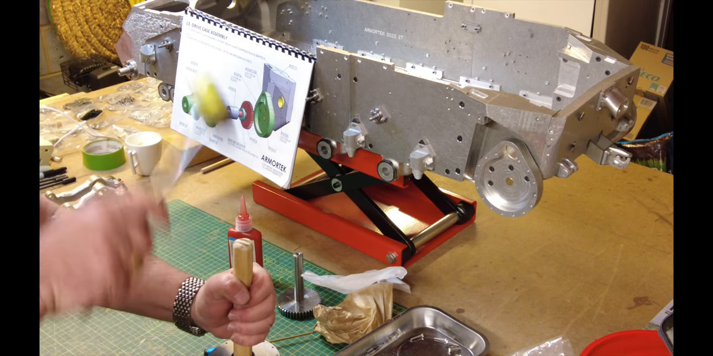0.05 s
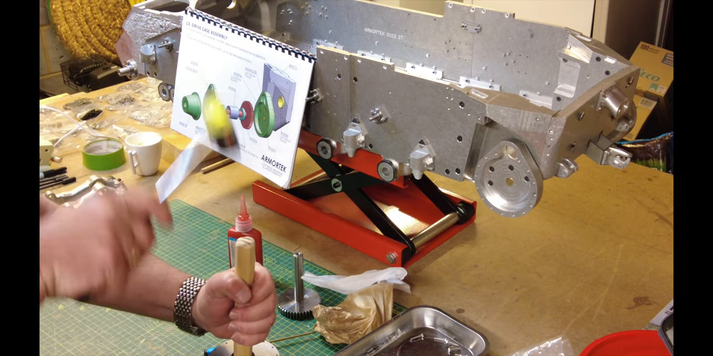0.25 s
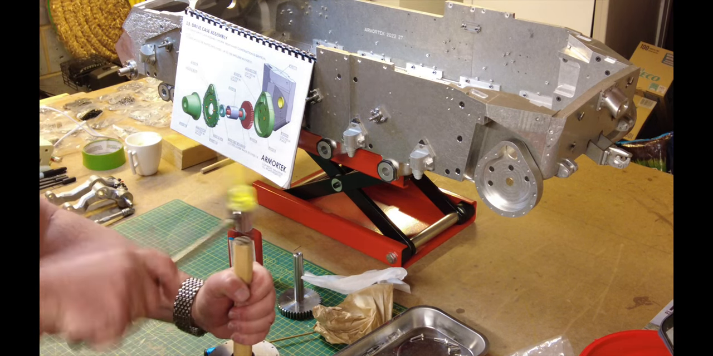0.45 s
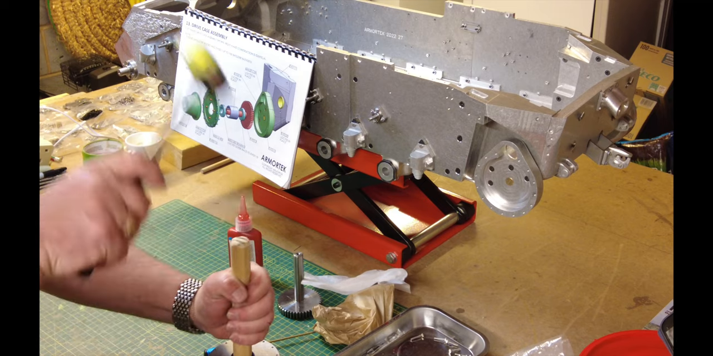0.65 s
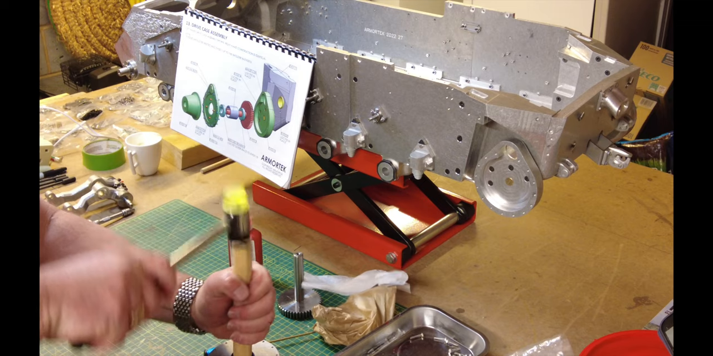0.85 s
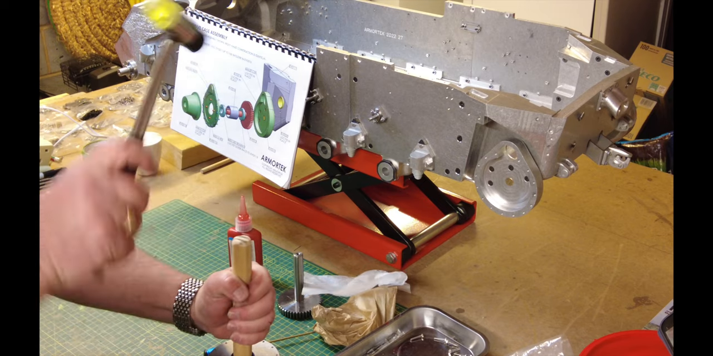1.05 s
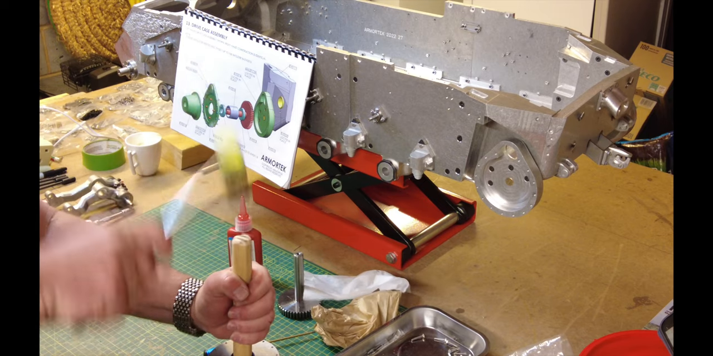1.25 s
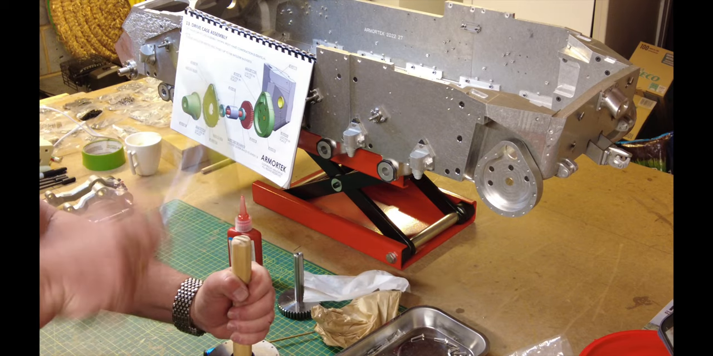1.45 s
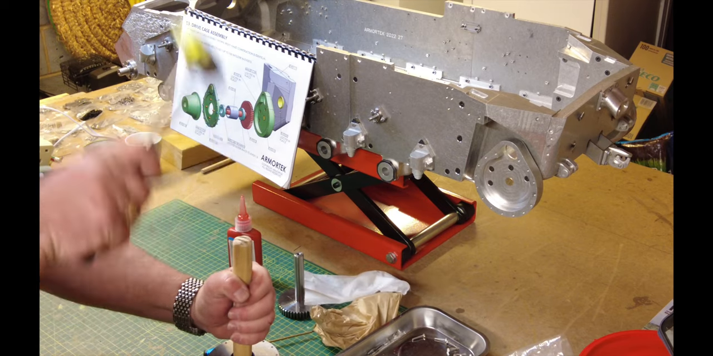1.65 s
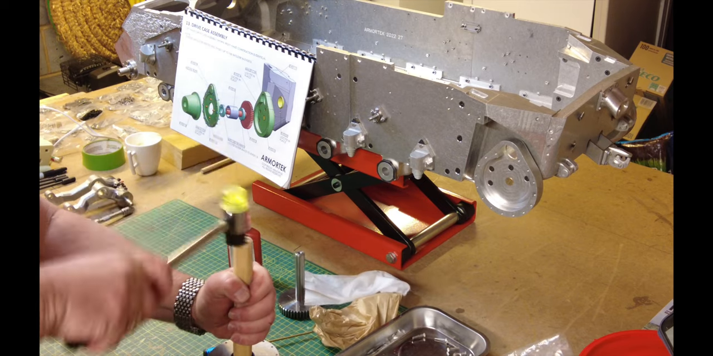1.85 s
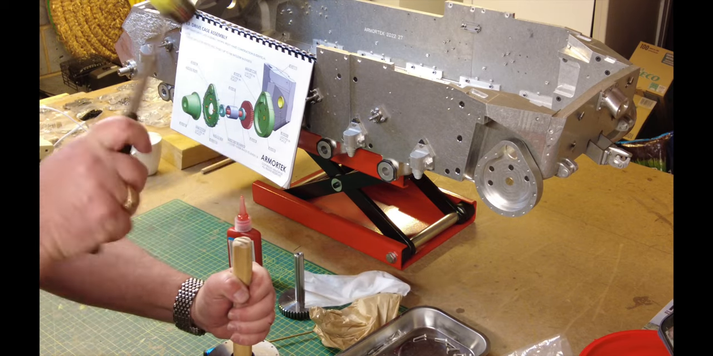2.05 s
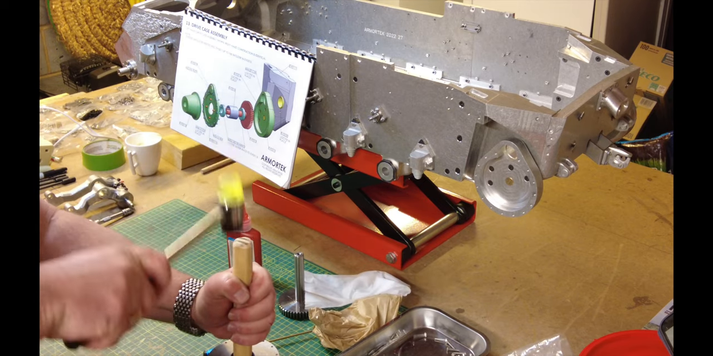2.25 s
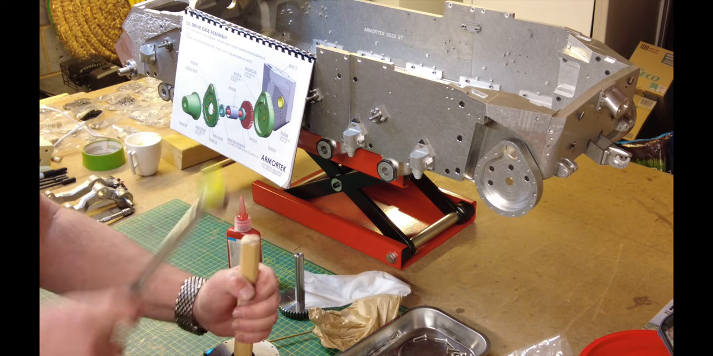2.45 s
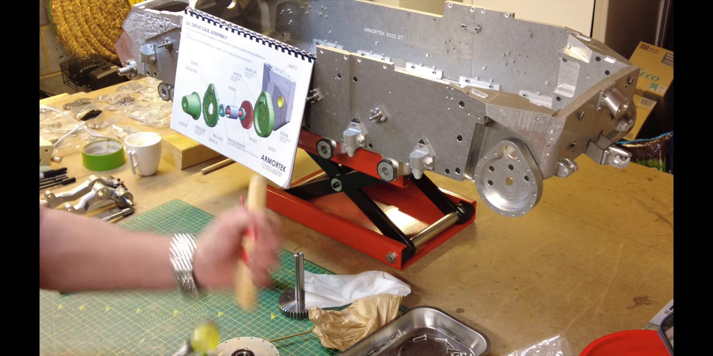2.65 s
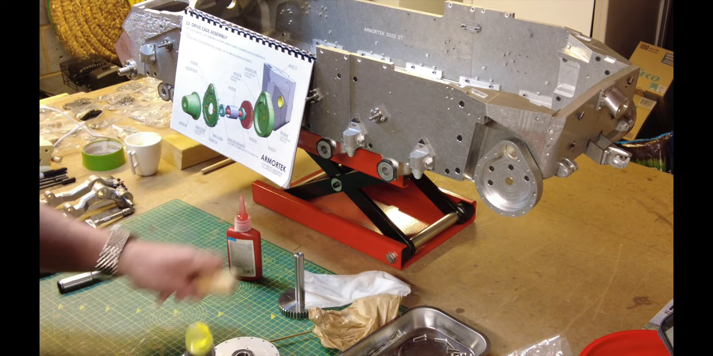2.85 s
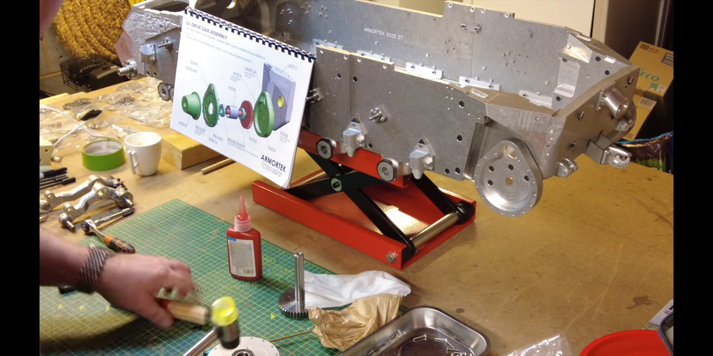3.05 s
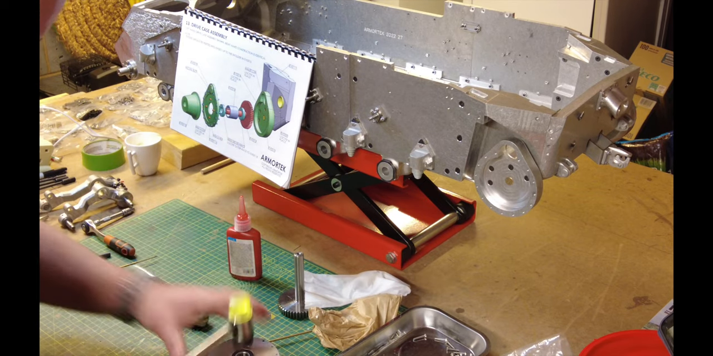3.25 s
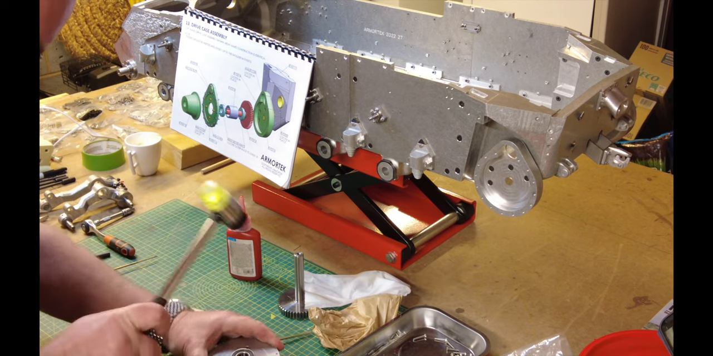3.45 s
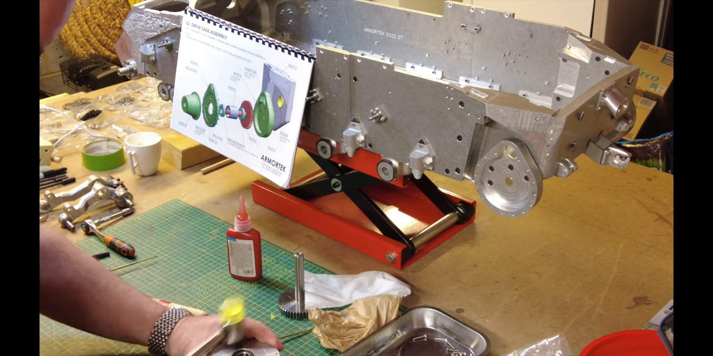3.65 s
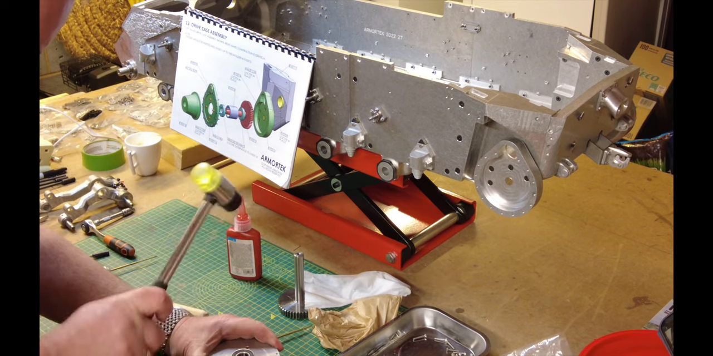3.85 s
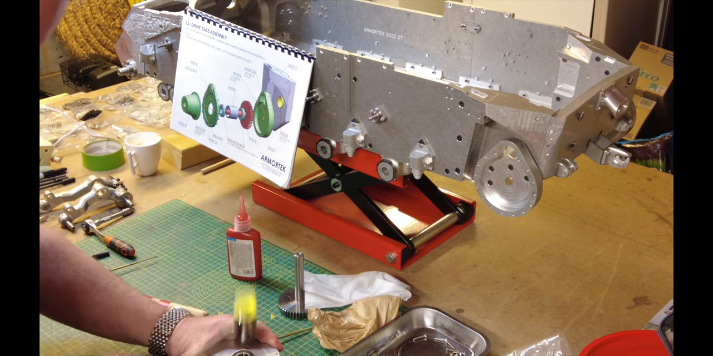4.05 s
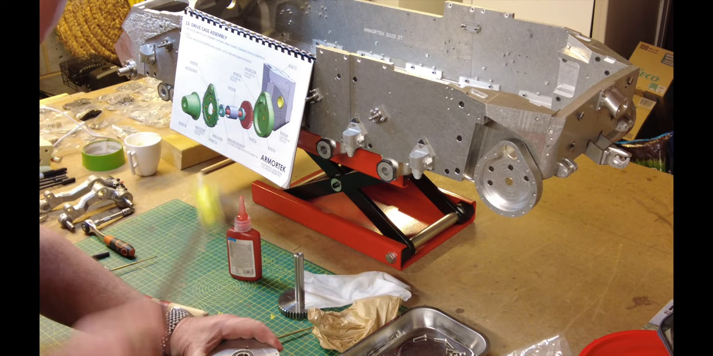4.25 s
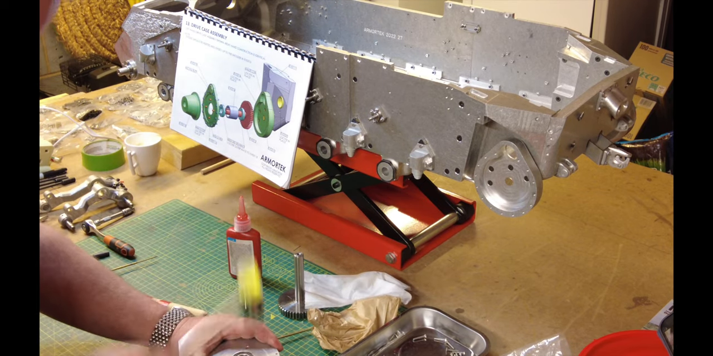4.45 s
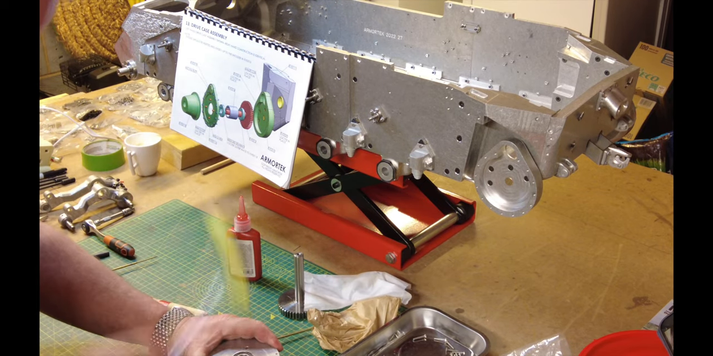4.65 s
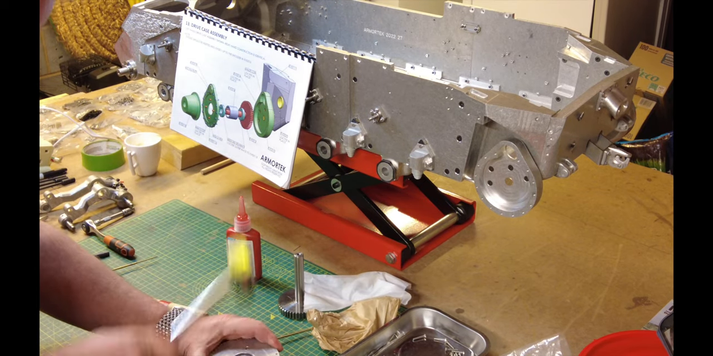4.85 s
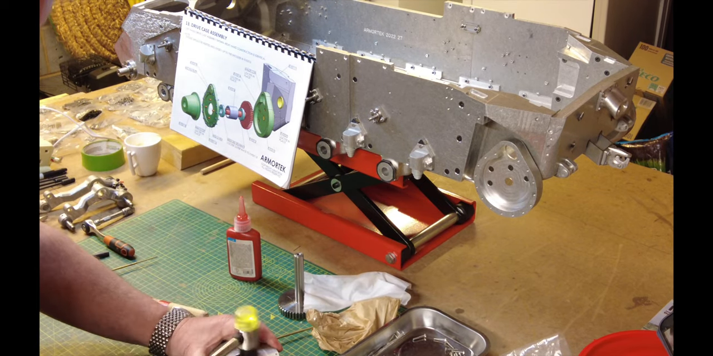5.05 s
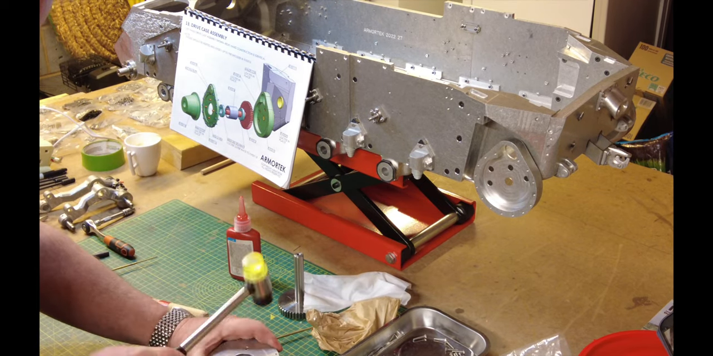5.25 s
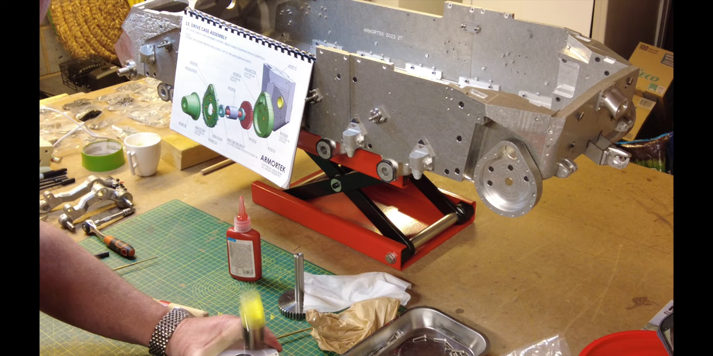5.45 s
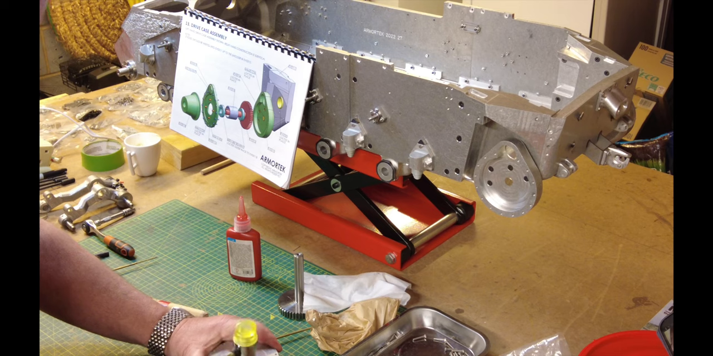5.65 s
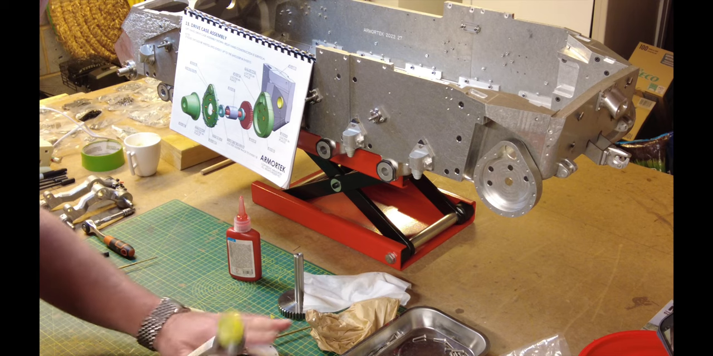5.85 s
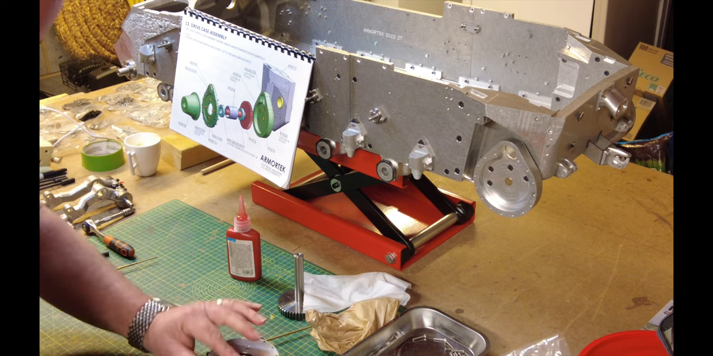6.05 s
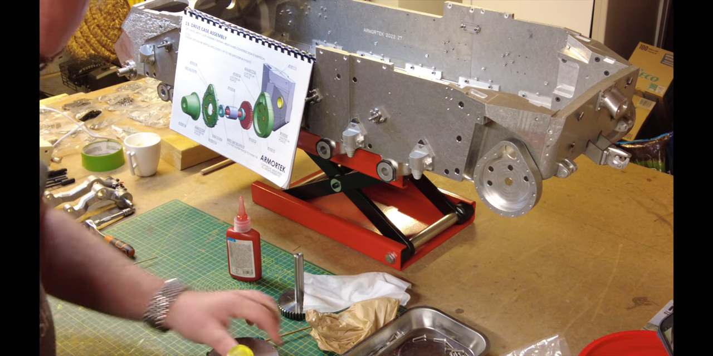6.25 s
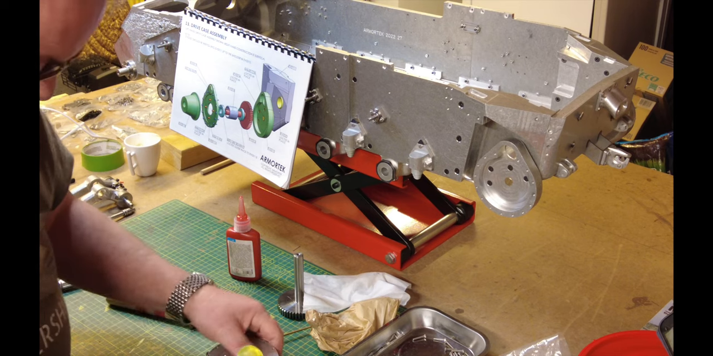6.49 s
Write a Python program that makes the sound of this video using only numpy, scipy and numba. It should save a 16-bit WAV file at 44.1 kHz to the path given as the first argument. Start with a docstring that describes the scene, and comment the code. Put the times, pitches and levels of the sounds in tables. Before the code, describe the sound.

Two runs of sharp mallet knocks on steel, with a booming bench, jingling tools and a short pause of quiet handling between them.

```python
"""A mallet drives a bearing home on a wooden workbench: seven blows through a hand-held drift,
a pause in which tools are put down, then seven blows straight on the part. Each blow cracks,
booms in the bench, rings the steel and the small workshop, and throws up loose tools that
rattle as they land. Once the bearing is seated its housing rings too. A limiter ducks each
blow and lets the room swell back."""
import sys
import numpy as np
from scipy import signal
from scipy.fft import rfft, irfft, next_fast_len
from scipy.io import wavfile
from numba import njit

SR = 44100
rng = np.random.default_rng(int(sys.argv[2]) if len(sys.argv) > 2 else 0)


def file_out(sig):
    """Save sig as 16-bit WAV at sys.argv[1]."""
    # one column per channel
    cols = np.atleast_2d(sig).T
    # limit, then scale
    lim = np.clip(cols, -1, 1)
    pcm = np.round(lim * 32767).astype(np.int16)
    wavfile.write(sys.argv[1], SR, pcm)


N = 287531
TIME = np.arange(int(.8 * SR)) / SR  # t/s within one event


def amp(db):
    """Decibels to gain."""
    return 10 ** (np.asarray(db) / 20)


def unit(x):
    """Scale to rms 1."""
    return x / np.sqrt(np.mean(x ** 2) + 1e-20)


def along(points, hz):
    """Interpolate (f/Hz, value) points over log frequency."""
    f, values = np.transpose(points)
    return np.interp(np.log(hz + 1), np.log(f), values)


def fade(t60_s, t=TIME):
    """Exponential decay, 60 dB down at t60_s."""
    return np.exp(-np.log(1000) * t / t60_s)


def onset(rise_s):
    """Exponential rise from 0 to 1."""
    return 1 - np.exp(-TIME / rise_s)


def colour(x, points):
    """Minimum-phase filter through (f/Hz, gain/dB) points."""
    size = 2 * next_fast_len(len(x))
    gain = amp(along(points, np.fft.rfftfreq(size, 1 / SR)))
    cepstrum = irfft(np.log(gain), size)
    cepstrum[1:size // 2] *= 2
    cepstrum[size // 2 + 1:] = 0
    return irfft(rfft(x, size) * np.exp(rfft(cepstrum)), size)[:len(x)]


def noise(points, size=len(TIME)):
    """Coloured noise of rms 1."""
    return unit(colour(rng.standard_normal(size), points))


def ringing(modes, linewidth_hz):
    """Damped (f/Hz, level/dB, t60/s) modes; phases wander as the parts shift in their seats."""
    steps = rng.standard_normal((len(modes), len(TIME)))
    wander = np.cumsum(steps, axis=1) * np.sqrt(2 * np.pi * linewidth_hz / SR)
    return sum(amp(db) * fade(t60_s) * np.sin(2 * np.pi * hz * TIME + phase)
               for (hz, db, t60_s), phase in zip(modes, wander))


def add(track, start_s, sound):
    """Mix a sound into the track."""
    part = track[round(start_s * SR):][:len(sound)]
    part += sound[:len(part)]


# Room noise spectrum: f/Hz, level/dB
AIR_SPECTRUM = [(12, -15), (20, -17), (32, -12), (68, -4.5), (182, -31.5), (222, -19.5), (678, -32.5),
                (976, -23), (1610, -40), (2910, -45), (3160, -45.5), (3630, -46), (5850, -49.5),
                (7110, -50), (16000, -63)]

def workshop_air(level_db=-59):
    """Low rumble and faint hiss of the room."""
    return amp(level_db) * noise(AIR_SPECTRUM, size=N)


# Strokes over the mat: t/s, length/s, level/dB
STROKES = [(2.407, 0.214, -54.5), (2.672, .06, -67), (2.82, 0.12, -70), (3.15, 0.196, -69),
           (3.47, 0.066, -77), (6.22, 0.27, -68.5)]
# Rubbing spectrum: f/Hz, level/dB
RUB_SPECTRUM = [(200, 7.5), (1200, 4.5), (2400, 5.5), (4200, -2), (6000, -7), (10000, -16.5),
                (16000, -30.5)]

def slides(attack_s=0.017, release_s=0.03, grain_hz=140):
    """Hand and tools rub over the mat with a dry, fine grain."""
    t = np.arange(N) / SR
    envelope = np.zeros(N)
    for start_s, length_s, db in STROKES:
        rise = np.clip((t - start_s) / attack_s, 0, 1)
        fall = np.clip(1 - (t - start_s - length_s) / release_s, 0, 1)
        envelope += amp(db) * rise * fall
    grain_db = 1.8 * np.interp(t * grain_hz, np.arange(N), rng.standard_normal(N))
    return envelope * unit(noise(RUB_SPECTRUM, size=N) * amp(grain_db))


# Hand against the bench: t/s, level/dB
HAND_BUMPS = [(3.079, -36), (3.355, -45), (5.917, -38), (5.951, -33.5), (6.139, -40), (6.336, -38.5)]

def bumps(t60_s=0.14, rise_s=0.011):
    """Soft, dull thuds of the hand on the bench."""
    track = np.zeros(N)
    for start_s, db in HAND_BUMPS:
        thud = noise([(40, -12), (140, -6.5), (250, -19), (500, -27), (3000, -48), (12000, -85)])
        add(track, start_s, amp(db) * thud * fade(t60_s) * onset(rise_s))
    return track


def drift_clink(lift_s=2.722, level_db=-68):
    """The steel drift rings faintly as it is lifted off the bearing."""
    track = np.zeros(N)
    ring = ringing([(3200, 0, 3), (7500, -5, .25)], linewidth_hz=170)
    taper = 1 - TIME / TIME[-1]
    add(track, lift_s, amp(level_db) * ring * taper)
    return track


# Tools put down and nudged: t/s, level/dB, click/dB
TOOL_TAPS = [(2.722, -54, 34.5), (2.961, -38, 14), (2.971, -28, 2.5), (3.081, -38, 4.5), (3.113, -37.5, 14),
             (3.415, -48, 1.5), (3.483, -39.5, 23), (3.507, -41, 7)]
# Tap spectrum: f/Hz, level/dB
TAP_SPECTRUM = [(47, -59.5), (80, 0.5), (135, 4.5), (177, -5.5), (219, 10.5), (300, -1), (820, -6.5),
                (3200, -31.5), (12000, -67), (15600, -102.5), (22000, -120)]

def tool_taps(thud_db=-5, tap_t60_s=0.016, room_db=-11, room_t60_s=0.28):
    """Light taps of tools on the mat, each with a little room tail."""
    track = np.zeros(N)
    envelope = fade(tap_t60_s) + amp(room_db) * fade(room_t60_s)
    for start_s, db, click_db in TOOL_TAPS:
        tilt = [(200, thud_db), (900, 0.0094), (5000, click_db)]
        tap = unit(colour(noise(TAP_SPECTRUM), tilt))
        add(track, start_s, amp(db) * tap * envelope)
    return track


# Reverberation spectrum: f/Hz, level/dB
ROOM_SPECTRUM = [(40, -13), (100, -13), (150, 1), (300, 2), (600, 3), (1000, 1.5), (1500, -3.5),
                 (2500, -11), (4000, -20.5), (5500, -23.5), (7200, -29.5), (10000, -32), (11500, -42.5),
                 (16000, -46)]
# Reverberation time: f/Hz, t60/s
ROOM_DECAY = [(100, 0.39), (250, 0.31), (900, 0.28), (4000, 0.32), (9000, 0.28), (15000, .29)]

def reverberation():
    """Diffuse tail of the workshop; each frequency decays at its own rate."""
    hz, t, bands = signal.stft(noise(ROOM_SPECTRUM), SR, nperseg=256)
    decay = fade(along(ROOM_DECAY, hz)[:, None], t)
    return signal.istft(bands * decay, SR, nperseg=256)[1][:len(TIME)]


# Modes of the loose tools: f/Hz, level/dB
TOOL_MODES = [(2480, 3), (2950, 7), (3900, 0), (4180, 5), (5450, -9.5), (7000, -3), (7320, -3.5),
              (7850, -8), (9450, -4.5), (9900, -6), (10550, -7), (13100, -14.5)]
# Their click spectrum: f/Hz, level/dB
CLICK_SPECTRUM = [(300, -21.5), (1200, -4), (2600, -6.5), (4200, 2.5), (5600, -7.5), (7300, -2),
                  (10500, -8), (11500, -12.5), (16000, -16)]

def rattle(force_db, gain_db=-32, log_spread=0.34, ticks_per_s=1300):
    """Thrown tools click and ring on landing; later and more spread out after a stronger blow."""
    throw = amp(force_db) ** 0.81
    flight_s = 0.066 * throw
    landing = np.exp(-.5 * (np.log((TIME + 1 / SR) / flight_s) / log_spread) ** 2)
    ticks = (rng.random(len(TIME)) < ticks_per_s / SR) * rng.standard_normal(len(TIME))
    modes = [(hz, db + 3 * rng.standard_normal(), .06) for hz, db in TOOL_MODES]
    ring = ringing(modes, linewidth_hz=60)
    clicks = unit(colour(ticks, CLICK_SPECTRUM)) * landing
    clinks = signal.fftconvolve(unit(ticks) * landing, ring / np.linalg.norm(ring))[:len(TIME)]
    return amp(gain_db) * (clicks + clinks) / np.sqrt(2 * throw)


# Metal frame spectrum: f/Hz, level/dB
FRAME_SPECTRUM = [(300, -9.5), (1000, 1.5), (1700, -8), (2700, 3), (3400, -12.5), (4200, 8.5), (5200, -9.5),
                  (7200, -6), (10000, -13), (14000, -39)]

def frame(gain_db=-39, t60_s=0.52):
    """A metal frame shivers in modes so close that they blur into noise."""
    return amp(gain_db) * noise(FRAME_SPECTRUM) * fade(t60_s)


# Modes of the steel parts: f/Hz, level/dB
STEEL_MODES = [(2650, -19.5), (4010, -24), (7120, -36.5), (9460, -40)]

def steel(detune=0.019, scatter_db=3, t60_s=0.3):
    """The steel parts ring a little differently each time they settle under a blow."""
    draws = rng.standard_normal((len(STEEL_MODES), 2))
    modes = [(hz * (1 + detune * pitch), db + scatter_db * level, t60_s)
             for (hz, db), (pitch, level) in zip(STEEL_MODES, draws)]
    return ringing(modes, linewidth_hz=170)


# Housing modes: f/Hz, level/dB, t60/s
HOUSING_MODES = [(826, -7, 0.28), (937, -9.5, 0.25), (1060, -9, 0.2)]

def housing():
    """The housing rings once the bearing sits tight in it."""
    return ringing(HOUSING_MODES, linewidth_hz=10)


# Modes of bench and work: f/Hz, level/dB
BENCH_MODES = [(145, 8.5), (167, -22), (233, 2.5), (281, 1), (345, 8.5), (389, -4.5), (424, 4), (468, -8.5),
               (528, 5), (591, 5.5), (630, -24.5), (650, -9.5), (685, -47), (727, -1.5), (764, 4), (782, 6),
               (809, 5), (836, -1.5), (895, -1.5), (950, 2), (1001, -16.5), (1020, -24.5), (1051, 1),
               (1114, 3), (1183, -8), (1366, -12), (1463, -16.5), (1528, -6)]
# Sway of the bench top, hum of the work: f/Hz, level/dB, t60/s
SWAY_MODES = [(36.8, -28.5, 0.5), (56.8, -22.5, 0.49), (93.6, -11.5, 0.17), (127.8, -2.5, .17),
              (342.4, -10.5, .24), (906, -18, 0.34)]

def bench(phases, boom_db=2, t60_s=0.18, scatter_db=2, rise_s=0.00053):
    """The bench booms in the same modes at slightly new strengths each blow, and its top sways."""
    hz, db = np.transpose(BENCH_MODES)
    gains = amp(db + scatter_db * rng.standard_normal(len(hz)))
    ring = gains @ np.sin(2 * np.pi * hz[:, None] * TIME + phases[:, None])
    boom = amp(boom_db) * unit(ring) * fade(t60_s) * onset(rise_s)
    return boom + ringing(SWAY_MODES, linewidth_hz=4)


# Modes of the struck part: f/Hz, level/dB, t60/s
KNOCK_MODES = [(432, -7, 0.022), (817, -0.5, 0.0074), (1032, -6, 0.014), (1368, -12, 0.015),
               (2560, -26, 0.018), (4770, -30, 0.014), (7650, -39, 0.028)]
# Contact crack spectrum: f/Hz, level/dB
CRACK_SPECTRUM = [(300, -2), (1000, 8.5), (3000, -3.5), (4200, -16.5), (7500, -9), (11000, -27),
                  (16000, -38)]

def contact(crack_db=-19, crack_t60_s=0.028, rise_s=0.0005):
    """Gritty crack and short knock; the plastic face gives, rounding the onset and dulling the top."""
    modes = [(hz, db + rng.standard_normal(), t60_s) for hz, db, t60_s in KNOCK_MODES]
    knock = ringing(modes, linewidth_hz=15)
    crack = amp(crack_db) * noise(CRACK_SPECTRUM) * fade(crack_t60_s)
    rounding = 1 - np.exp(-(TIME / rise_s) ** 2)
    return colour((knock + crack) * rounding, [(3000, 0), (8000, -3), (15000, -10)])


# Bright chatter of the bearing, struck directly and not yet seated: f/Hz, gain/dB
CHATTER_EQ = [(2800, 3), (4200, -4.5), (5500, -2), (7200, 7.5), (9500, 1.5), (15000, 1)]
# Mallet blows: t/s, force/dB, hardness/dB
MALLET_BLOWS = [(0.124, -9.5, -1), (0.4699, -3.5, -2.5), (0.818, -2, -2.5), (1.155, -0.5, -3),
                (1.495, 1, -1.5), (1.8385, 2, -2.5), (2.1807, 3, -0.5), (3.5996, -3, -3), (3.9702, -3, 2),
                (4.3269, -1.5, 3), (4.6978, -1.5, 7), (5.0478, -1, 0), (5.3524, -5, -3), (5.5928, -6.5, -3)]

def mallet(direct_s=3.0, seated_s=5.0, contact_db=16.5, room_db=-2, build_s=0.011, fresh_share=0.38):
    """Blows land on nearly the same spot, so most of the room's answer repeats."""
    track = np.zeros(N)
    phases = rng.uniform(0, 2 * np.pi, len(BENCH_MODES))
    repeating_room = reverberation()
    for start_s, force_db, hard_db in MALLET_BLOWS:
        room = np.sqrt(1 - fresh_share) * repeating_room + np.sqrt(fresh_share) * reverberation()
        diffuse = (amp(room_db) * room + steel() + frame()) * onset(build_s)
        body = bench(phases) + diffuse
        if start_s > seated_s:
            body += housing()
        # a hard, square hit has less middle, more thump and clack
        middle_db = force_db - hard_db
        tilt = [(250, hard_db - 0.5), (800, 0.016), (2500, hard_db - 0.4), (7500, hard_db + 1.5)]
        # extra force goes mostly into the bench, little into the contact
        blow = amp(middle_db) * body + amp(contact_db + 0.35 * middle_db) * contact()
        loose_parts = rattle(force_db)
        if direct_s < start_s < seated_s:
            loose_parts = colour(loose_parts, CHATTER_EQ)
        add(track, start_s, colour(blow, tilt) + loose_parts)
    return track


def scene():
    """Mallet, handling sounds and room noise in mono."""
    return (mallet() + tool_taps() + slides() + drift_clink() + bumps() + workshop_air())[None]


@njit
def follow_peak(level, charge, discharge):
    """Peak detector; charge and discharge are fractions per sample."""
    held = np.zeros(len(level))
    for i in range(1, len(level)):
        if level[i] > held[i - 1]:
            held[i] = held[i - 1] + charge * (level[i] - held[i - 1])
        else:
            held[i] = held[i - 1] * (1 - discharge)
    return held


def record(dry, threshold=0.38, clip_level=0.76, attack_s=0.00057, release_s=0.027, cutoff_hz=15800):
    """A limiter ducks each blow; the first cycles overshoot and clip softly, ahead of a low-pass."""
    charge = 1 - np.exp(-1 / (attack_s * SR))
    held = follow_peak(np.abs(dry[0]), charge, 1 / (release_s * SR))
    limited = dry / np.maximum(1, held / threshold)
    clipped = limited / (1 + (limited / clip_level) ** 4) ** (1 / 4)
    lowpass = signal.firwin(255, cutoff_hz, fs=SR, window="blackmanharris")
    return signal.fftconvolve(clipped, lowpass[None], mode="same", axes=1)


dry = scene()
out = record(dry)
file_out(out)
```